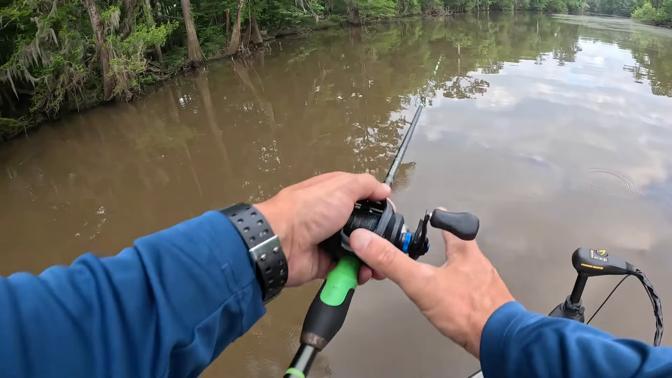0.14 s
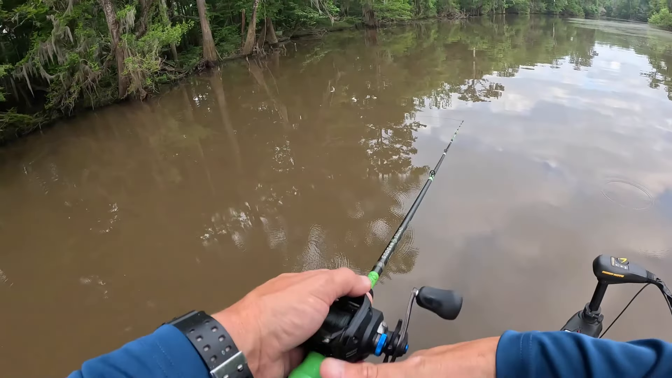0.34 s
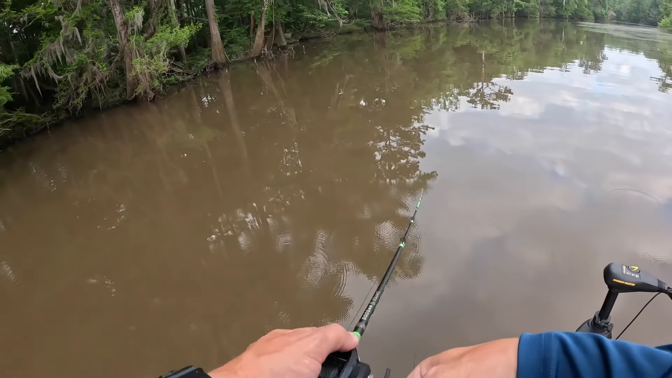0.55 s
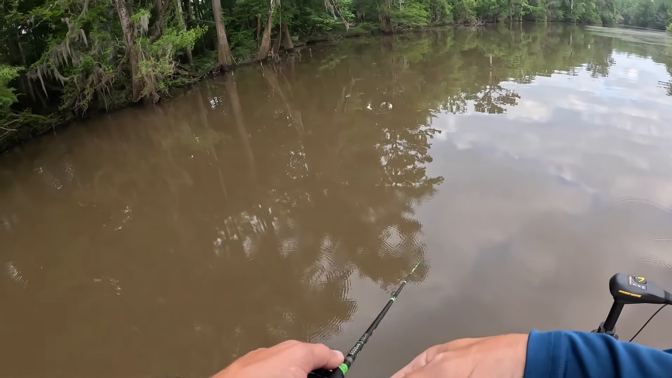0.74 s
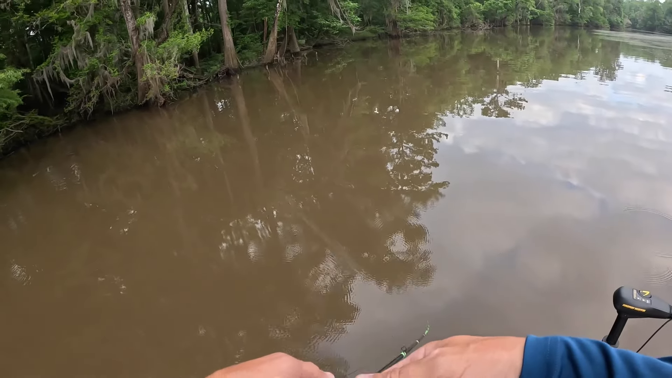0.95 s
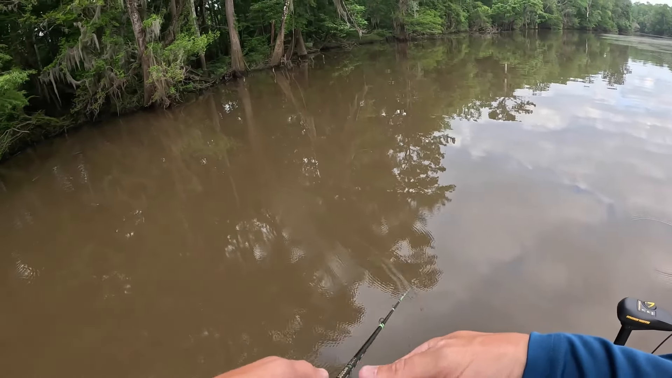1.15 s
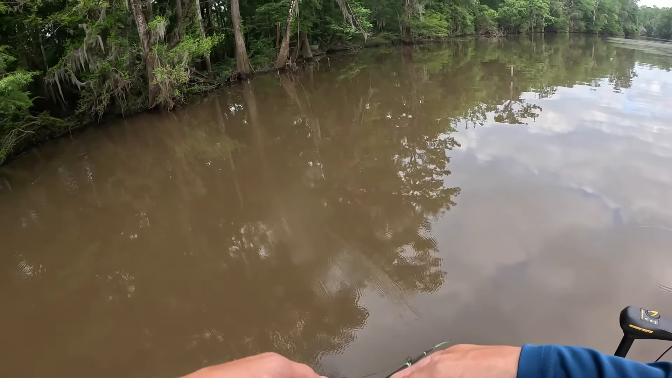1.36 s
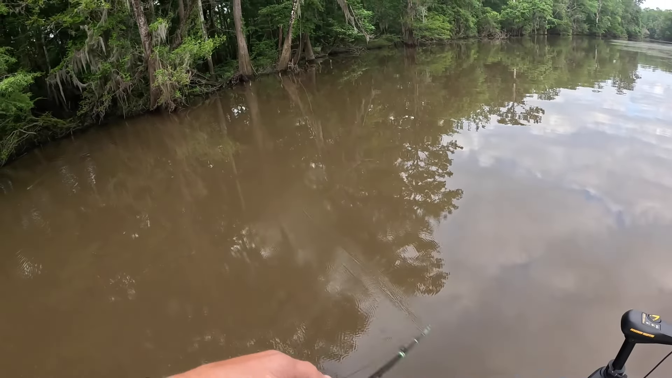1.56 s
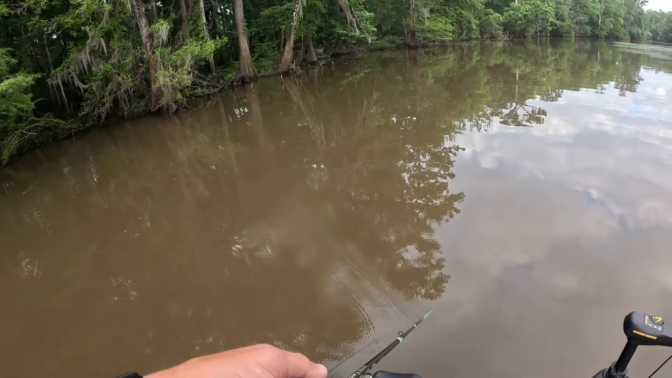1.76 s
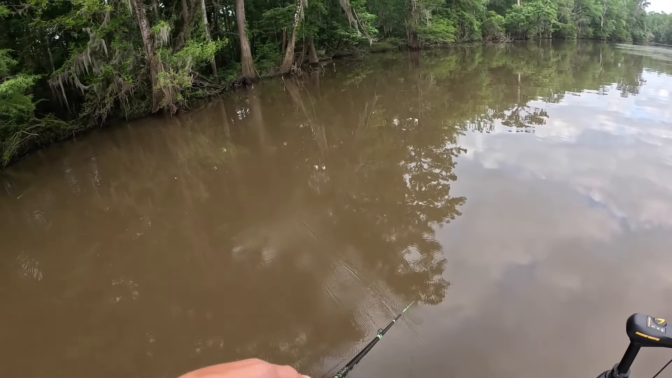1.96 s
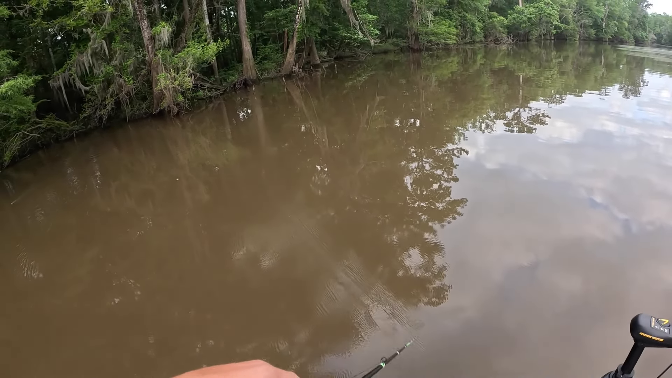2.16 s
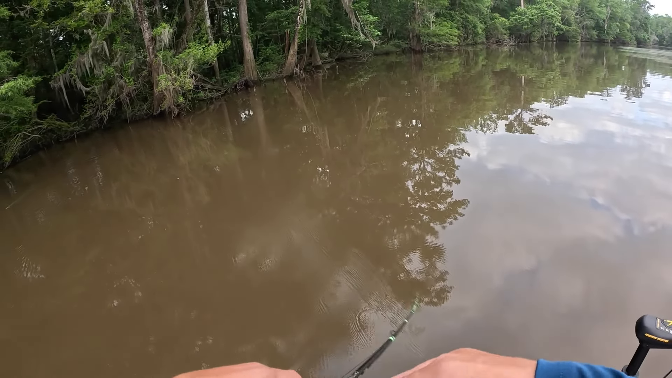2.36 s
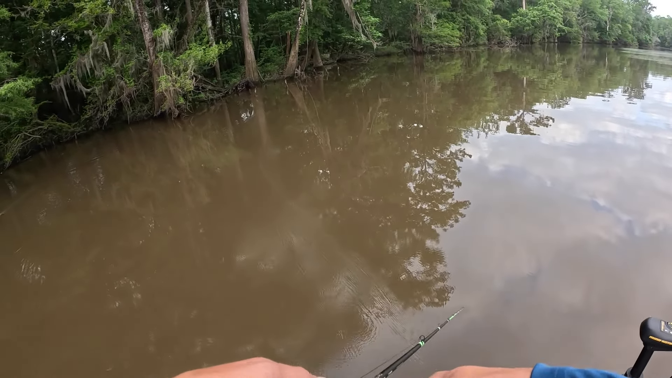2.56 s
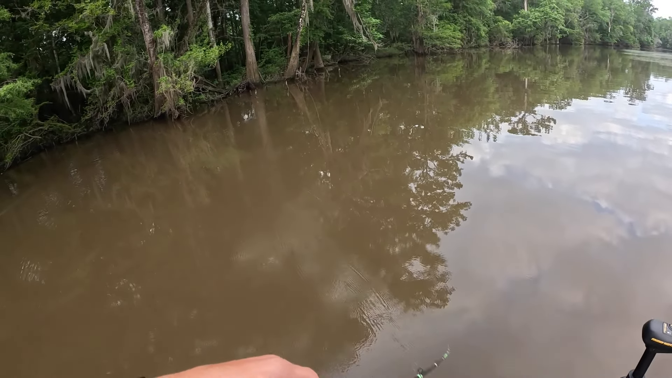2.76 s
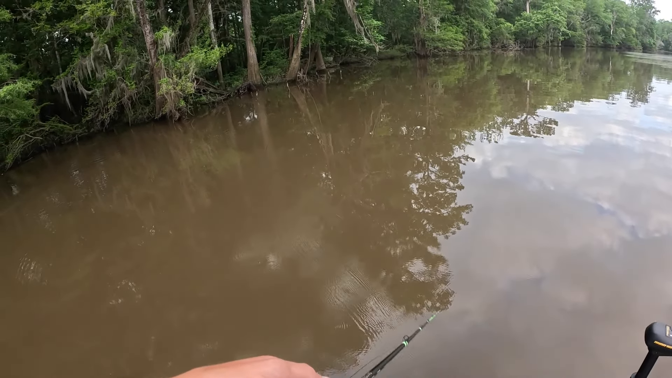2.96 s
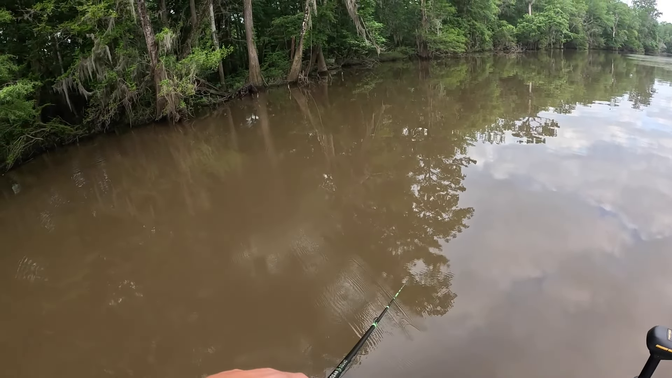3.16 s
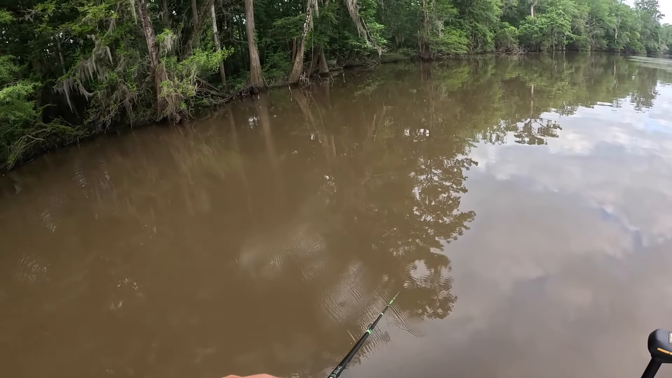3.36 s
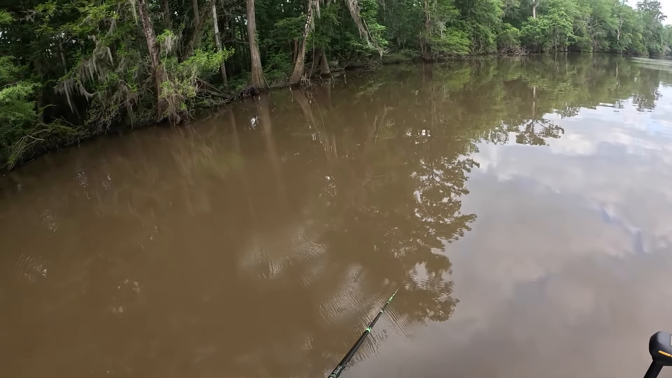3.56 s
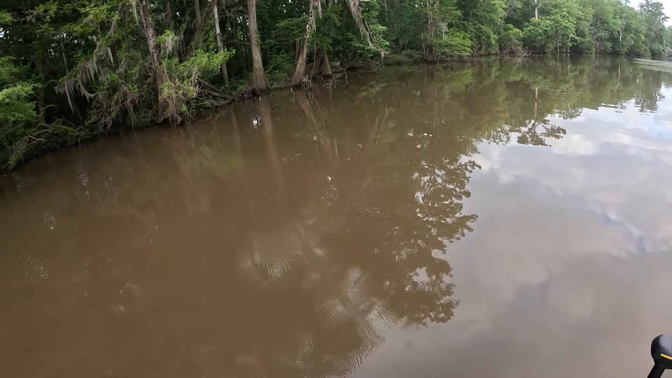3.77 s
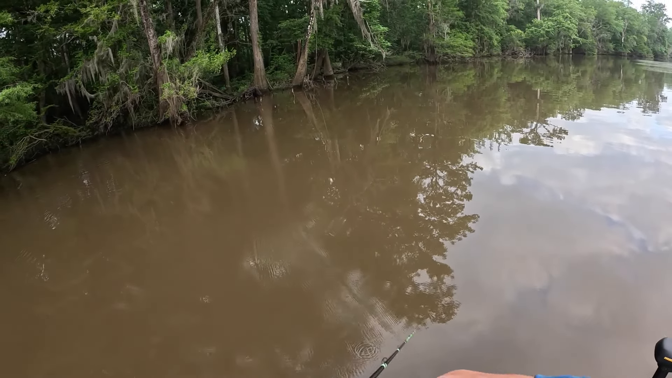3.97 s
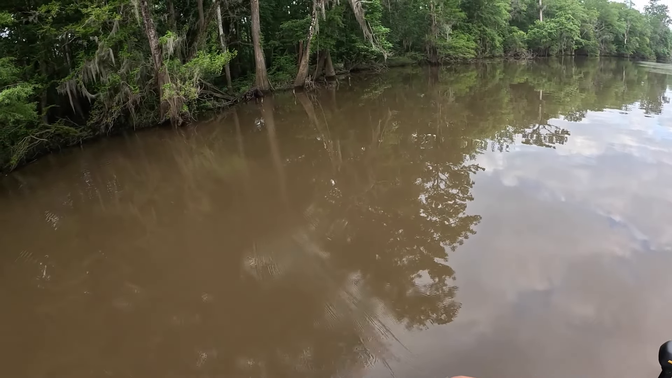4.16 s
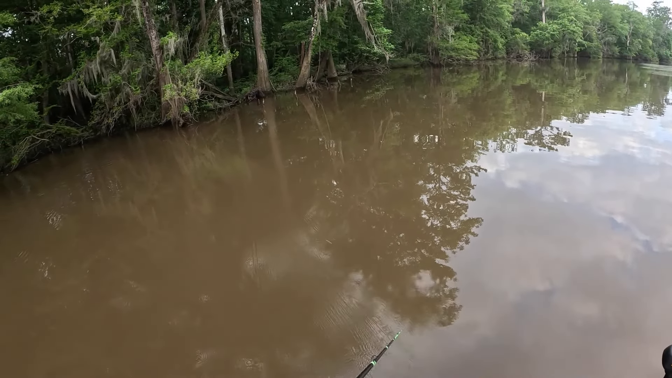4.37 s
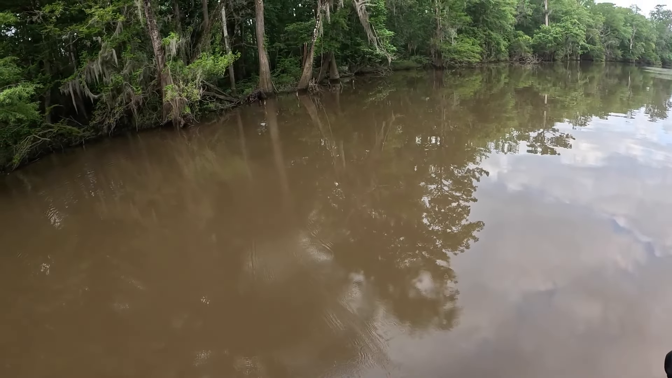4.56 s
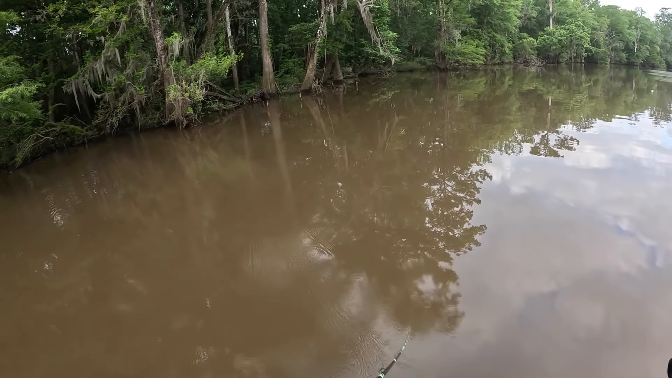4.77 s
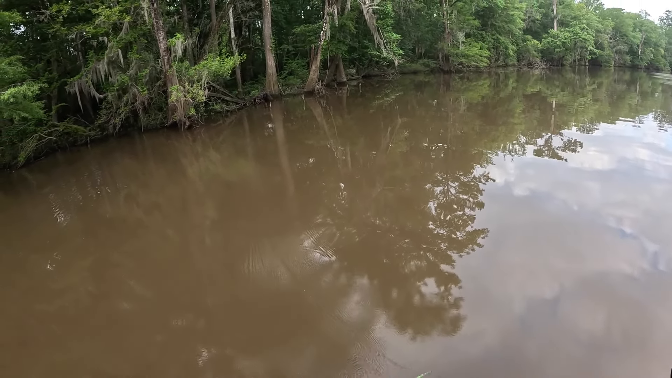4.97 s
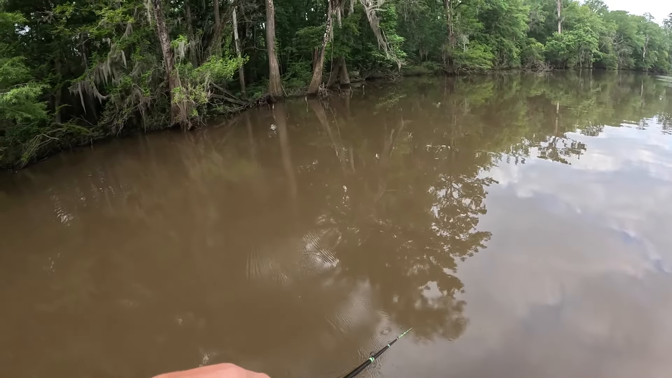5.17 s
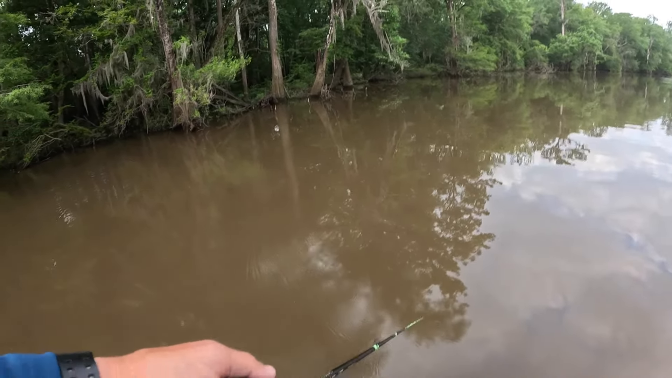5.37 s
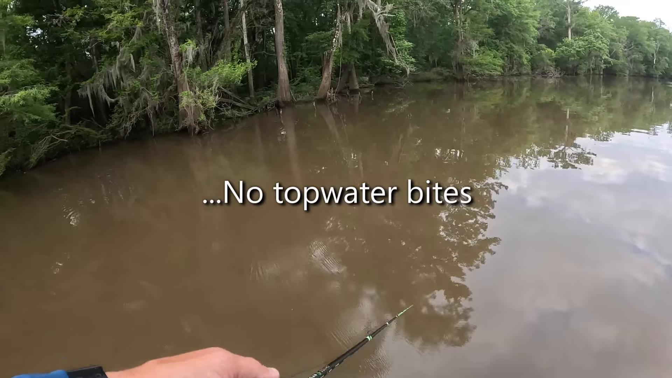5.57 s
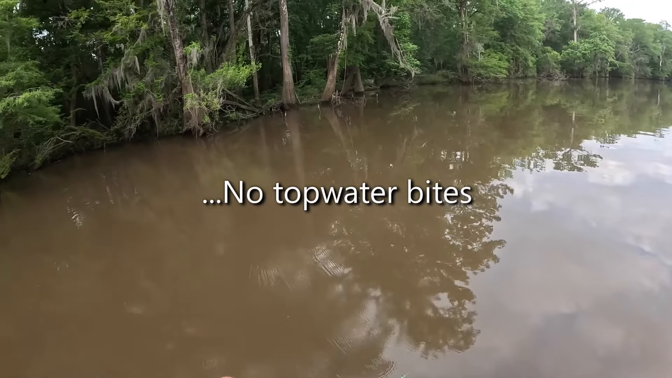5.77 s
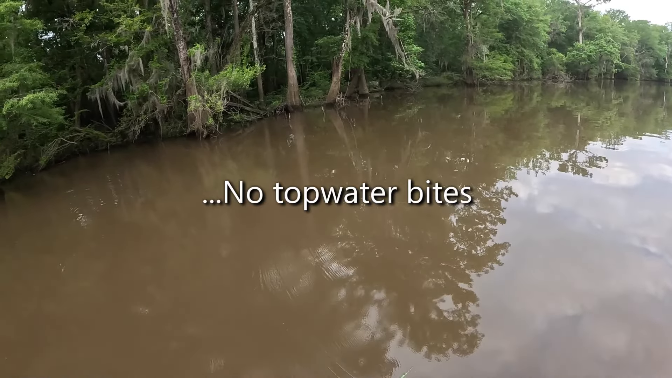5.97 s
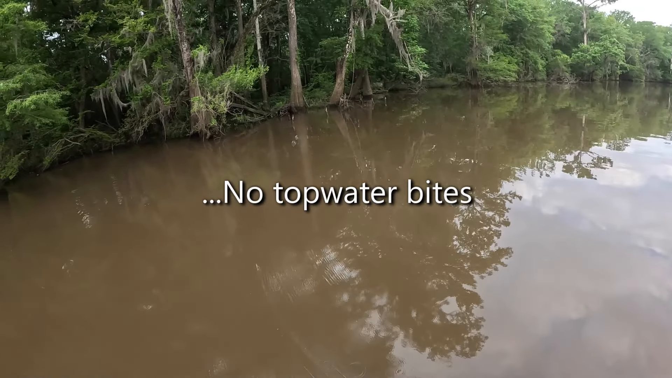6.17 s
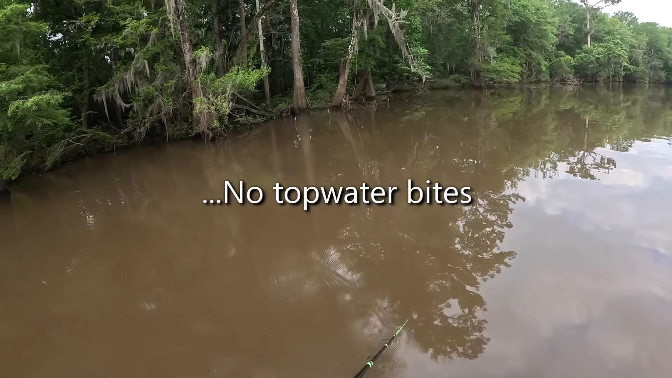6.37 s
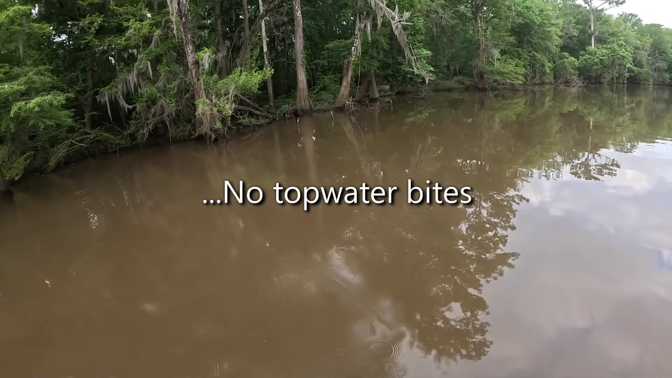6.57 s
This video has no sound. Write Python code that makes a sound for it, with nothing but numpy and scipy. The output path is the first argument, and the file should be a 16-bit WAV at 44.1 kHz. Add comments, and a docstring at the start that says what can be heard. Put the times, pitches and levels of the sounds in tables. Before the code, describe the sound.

Close fishing reel: a low whirring spool, hard metal clack, rhythmic scratchy cranking, sparse bird yelps, hull laps, late cloth rub and bumps.

```python
"""Baitcasting reel on a river boat

Heard close by, a spool whirs out as a low shake and a rough tone, and its clutch clacks in as ringing cracks.
The line is wound back with gear grind, hiss and ticks: quick tugs zip as bands of noise, and line snapping
taut whistles as a gliding tone. Water laps at the hull as thuds and rising bubble tones; birds call
in gliding tones, echoed from the trees. Late on, a sleeve brushes a camera as shaped noise and bumps its case."""
import sys
import numpy as np
from scipy import signal
from scipy.fft import rfft, irfft, next_fast_len
from scipy.io import wavfile
from scipy.ndimage import uniform_filter1d, map_coordinates

SR = 44100
rng = np.random.default_rng(int(sys.argv[2]) if len(sys.argv) > 2 else 0)


def unload_audio(sound):
    """Save the sound as a 16-bit wav file, at the path given as the first command line argument."""
    columns = np.transpose(np.atleast_2d(sound))
    # keep every value between -1 and 1, then stretch to whole-number steps
    steps = np.round(np.clip(columns, -1, 1) * 32767)
    wavfile.write(sys.argv[1], SR, steps.astype(np.int16))


N = 291942  # length in samples

# Levels in the tables are relative within a layer; each function adds its own offsets.
# low rumble, also the colour of the hull's thud: frequency_hz, gain_db
RUMBLE_SPECTRUM = [(20, -0.5), (55, 1), (90, -5.5), (165, -7.5), (230, -13.5), (300, -22), (400, -30.5),
                   (600, -39.5), (1000, -31), (2000, -65.5)]
# decay of the echo from the trees: frequency_hz, t60_s
TREE_DECAY = [(300, 1), (3000, 0.53), (9000, 0.12)]
# a bird's sharp falling calls: start_s, level_db
YELPS = [(0.76, -39), (2.7702, -38.5), (3.085, -42)]
# a thin whistle from the trees: start_s, level_db
FAR_NOTES = [(5.506, -62.5), (5.616, -65)]
NOTE_START_HZ, NOTE_RISE_HZ_PER_S, NOTE_S = 2970, 6500, 0.082
# laps under the hull, with the largest air pocket of each: start_s, level_db, nominal pitch_hz, t60_s, thud_db
LAPS = [(2.619, -37.5, 281.5, 0.28, -63), (3.186, -37, 257, 0.093, -46), (3.285, -35.5, 466, 0.063, -47),
        (3.349, -46.5, 397, 0.21, -52), (3.566, -42.5, 289, .14, -40.5)]
THUD_RISE_S = 0.033  # time to the thud's peak
# small bubbles: greatest delay, ratio of their pitch and decay, and level relative to the large one
BREAKUP_S, SMALLER_RATIO, SMALLER_DB = .045, 1.6, -6.5

# the sleeve's sweep: time_s, rub_db, swish_db
SLEEVE_SWEEP = [(5.22, -61, -70), (5.30, -43, -49.5), (5.34, -41, -44), (5.385, -27.5, -45),
                (5.42, -36, -45), (5.45, -18, -55), (5.50, -47.5, -58.5), (5.57, -60, -75),
                (5.64, -68, -80)]
# low rub and bright swish of cloth: frequency_hz, gain_db
RUB_SPECTRUM = [(20, 1), (60, -5), (110, -5.5), (250, -13.5), (400, -21), (600, -39), (1200, -31),
                (2500, -80)]
SWISH_SPECTRUM = [(290, -32), (500, -3), (586, -6.5), (968, -7.5), (1060, -14), (1180, -9), (2840, -7),
                  (5280, -19), (7130, -11.5), (15500, -36)]
# bumps on the camera: start_s, push_db, push time scale_s, knock_db, tick_db
BUMPS = [(5.4248, -17.5, 0.0012, -16, -18.5), (5.43, -9, 0.0032, -23, -48), (5.446, -38, 0.0018, -20, -31),
         (5.48, -16.5, 0.0086, -37.5, -65)]
# resonances of the camera case: frequency_hz, width_hz, gain_db
CASE_RESONANCES = [(145, 48, -3), (252, 91, -0.5), (314, 50, 0.5), (437, 78, -5), (750, 560, -24.5)]

# course of the winding: time_s, line hiss_db, gear_db
WINDING = [(0.0, -65, -67), (0.18, -64, -67), (0.35, -59.5, -54.5), (0.61, -59.5, -64), (1.58, -62.5, -72),
           (1.82, -59, -59), (2.4, -58.5, -66.5), (2.63, -56, -63.5), (3.02, -57.5, -61.5),
           (3.37, -65, -72), (3.82, -60, -68), (4.44, -61.5, -70), (4.68, -59, -64.5), (5.18, -58, -69),
           (5.53, -64, -71.5), (5.71, -60, -61), (5.86, -58.5, -58), (6.62, -58, -65.5)]
# resonances of the reel's housing: frequency_hz, width_hz, gain_db
HOUSING_RESONANCES = [(1260, 440, -8), (1799, 154, 0), (2022, 8, 3.5), (2136, 11.5, 0), (2445, 26, -11),
                      (2706, 270, -9)]
# hiss of the running line: frequency_hz, gain_db
HISS_SPECTRUM = [(1180, -12.5), (2000, -8), (2350, -2), (2770, -4), (3070, 0), (3770, -1.5), (5450, -2),
                 (5990, -2.5), (7170, 1.5), (8010, 1.5), (8580, -6), (10400, -22), (11900, -13.5),
                 (15500, -37)]
# line biting onto the spool: nominal time_s, level_db, gear_db relative to that level
RASPS = [(0.709, -50, -37), (0.999, -45.5, -27), (1.355, -43, -14.5), (1.643, -38, -16.5),
         (2.1, -45.5, -14), (2.453, -35.5, -14), (3.764, -47, -10), (4.161, -45, -5.5),
         (4.572, -51.5, -0.5), (4.895, -48, -7), (6.206, -47, -0.5)]
# colour of a rasp: frequency_hz, gain_db
RASP_SPECTRUM = [(1470, -12), (2500, -2), (2780, -11), (3100, -4.5), (4640, -6.5), (8160, 1.5),
                 (9010, -5.5), (12200, -14.5), (15500, -27)]
RASP_HALF_S = .018  # from a rasp's peak to 1/e of it
# spells of even cranking, with repeated tugs: first_tug_s, last_tug_s, approximate rate_per_s, level_db
CRANKING = [(0.847, 1.241, 10.3, -42), (1.526, 1.728, 10.2, -40.5), (1.867, 2.275, 9.8, -42),
            (2.515, 3.162, 9.3, -42), (3.271, 4.023, 7.9, -44.5), (4.138, 4.478, 8.8, -42.5),
            (4.578, 5.291, 9.8, -43.5), (5.574, 5.659, 11, -45.5), (5.957, 6.559, 9.9, -45)]
TUG_SCATTER_DB, TUG_JITTER_S = 3.5, .002  # standard deviations from tug to tug
# slack line snapping taut: nominal time_s, level_db
SNATCHES = [(0.699, -48), (0.844, -45.5), (0.944, -50), (1.972, -48), (2.076, -47), (2.117, -48.5),
            (2.339, -47), (2.401, -47), (2.524, -46.5), (2.718, -47), (2.777, -45), (2.837, -51.5),
            (2.983, -51), (3.048, -50), (3.261, -48), (3.394, -47), (3.534, -49.5), (3.646, -43),
            (4.023, -53), (4.716, -47), (4.824, -43), (4.924, -44.5), (5.235, -52), (5.937, -46.5)]
# base pitch, rise above it at the snatch, and nominal lead of the sag on the snatch
SLACK_HZ, TAUT_RISE_HZ, SAG_LEAD_S = 547, 369.7, 0.036

# loudest metal contacts in the reel: nominal start_s, level_db, body_db, frame_db (last two relative to level)
CONTACTS = [(0.138, -25, -4, -25), (0.263, -40, 3, -4), (0.342, -6.5, -24, -30), (0.3521, -7.5, -16, -23),
            (0.357, -1.5, -12.5, -18), (0.407, -28.5, 6, -27), (0.451, -19, 0.5, -36),
            (0.485, -28, -4, -21), (0.496, -30, -4, -2.5), (0.52, -16.5, -1, -25.5), (0.735, -35, -3, -7),
            (1.625, -40, -24, -14), (1.71, -30, -5, -35), (1.907, -30.5, -6, -8.5),
            (1.987, -33.5, 7.5, -16), (2.169, -37, -29, -23), (2.206, -37.5, -0.5, -26),
            (3.135, -30.5, -16, -15), (3.837, -31.5, -30, -32), (3.9, -32, -13, -39),
            (4.868, -35.5, -29, -23), (5.682, -20, -12, -13.5), (5.725, -23, -16, -17.5),
            (5.816, -30.5, -30, -30), (5.835, -25, -28, -30), (5.867, -18, -17, -25),
            (5.899, -40.5, 5.5, -6), (5.988, -30, -18, -18), (6.133, -29.5, -16, -15.5),
            (6.5, -29.5, -10, -17.5)]
# modes of the reel's frame and side plates: frequency_hz, level_db, undamped t60_s
REEL_MODES = [(860, -16.5, 0.063), (1043, -5, 0.12), (1190, -7.5, 0.057), (1380, -44, 0.037),
              (1479, -4, 0.059), (1780, 2.5, 0.03), (1770, -9.5, 0.11), (1860, -14, 0.025),
              (2860, -2, 0.034), (3100, -10.5, 0.028), (4025, -5.5, 0.028), (4120, -23, 0.061),
              (4830, -25, .035), (6150, -3, 0.0063), (6700, -46, 0.017), (7600, -12, 0.017)]
# colour of a metal crack: frequency_hz, gain_db
CRACK_SPECTRUM = [(150, -6), (400, -12), (620, -10), (1100, -3.5), (1750, 2.5), (2400, -3), (3000, -16.5),
                  (3450, -6), (4000, -4.5), (5100, -5.5), (8000, -4), (10500, -22.5), (12200, -25),
                  (15500, -54)]
# the free spool: time_s, shake_db, whirr_db, whirr pitch_hz
FREE_SPOOL = [(0.0, -35.5, -60, 396), (0.09, -36.5, -59, 431), (0.252, -35, -58.5, 417),
              (0.318, -37, -61, 373), (0.33, -32, -66, 396)]

TOP_HZ = 15750  # upper limit of the band


def amp(db):
    """Logarithmic level: decibels to gain."""
    return 10 ** (np.asarray(db) / 20)


def unit(x):
    """Power normalization: scaled to rms 1."""
    return x / np.sqrt(np.mean(x ** 2) + 1e-20)


def crest(x):
    """Peak normalization: scaled to peak 1."""
    return x / (np.abs(x).max() + 1e-20)


def along(points, hz):
    """Interpolation of (Hz, value) points on a log-frequency axis."""
    f, v = np.transpose(points)
    return np.interp(np.log(hz + 1), np.log(f + 1), v)


def curves(rows):
    """Linear interpolation in time: one curve for each column after the time."""
    s, *columns = np.transpose(rows)
    return [np.interp(np.arange(N) / SR, s, column) for column in columns]


def during(rows, fade):
    """Exponential gating: 1 over the span of a table, dying away outside it."""
    t = np.arange(N) / SR
    outside = np.abs(t - np.clip(t, rows[0][0], rows[-1][0]))
    return np.exp(-outside / fade)


def wobble(rate, size=N):
    """Band-limited randomness: a smooth random curve, rate knots a second."""
    knots = rng.standard_normal(int(size * rate / SR) + 4)
    return map_coordinates(knots, [np.arange(size) * rate / SR])


def phase(hz):
    """Phase as the running integral of a moving pitch."""
    return 2 * np.pi * np.cumsum(hz) / SR


def scrape(hz, width, size):
    """Quadrature modulation: a narrow band of noise around a moving pitch."""
    turn = phase(hz)
    return wobble(width, size) * np.cos(turn) + wobble(width, size) * np.sin(turn)


def filtered(x, response):
    """Linear filtering: the spectrum times a response of frequency."""
    n = x.shape[-1]
    m = next_fast_len(n + 8192)
    return irfft(rfft(x, m) * response(np.fft.rfftfreq(m, 1 / SR)), m)[..., :n]


def colour(points):
    """Minimum phase: a causal response with the gain of (Hz, dB) points."""
    def response(hz):
        # folding the cepstrum forward in time gives the minimum phase
        cepstrum = irfft(np.log(amp(along(points, hz)) + 1e-6))
        half = len(cepstrum) // 2
        cepstrum[1:half] *= 2
        cepstrum[half + 1:] = 0
        return np.exp(rfft(cepstrum))
    return response


def resonant(peaks):
    """Modal superposition: (Hz, width, dB) resonances summed with alternating sign."""
    def response(f):
        total = 0
        for k, (centre, width, db) in enumerate(peaks):
            mode = 1j * f * width / (centre * centre - f * f + 1j * f * width)
            total = total + (-1) ** k * amp(db) * mode
        return total
    return response


def pair(side_db, size=N):
    """Partial coherence: white noise in two channels, partly alike."""
    mid, side = rng.standard_normal((2, size))
    return np.array([mid + amp(side_db) * side, mid - amp(side_db) * side])


def noise(response, side_db):
    """Spectral shaping: coloured stereo noise of rms 1."""
    return unit(filtered(pair(side_db), response))


def pan(db):
    """Interchannel level difference: channel gains, positive db to the left."""
    return amp(np.array([[db], [-db]]) / 2)


def add(track, s, sound):
    """Superposition: mix a sound in at time s."""
    i = max(round(s * SR), 0)
    part = track[..., i:i + sound.shape[-1]]
    part += sound[..., :part.shape[-1]]


def air():
    """Low-frequency noise: the rumble of breeze and handling, slowly varying in level."""
    return amp(-49.5 + 2.54 * wobble(9)) * noise(colour(RUMBLE_SPECTRUM), side_db=-13.5)


def birds():
    """Harmonic voicing and diffuse echo: nasal falling yelps and a thin rising whistle off the wooded bank."""
    calls, t = np.zeros(N), np.arange(SR // 14) / SR
    for s, db in YELPS:
        falling_hz = 1530 - 330 * (t / 0.037) ** 2
        turn = phase(falling_hz * (1 + 0.0283 * wobble(400, len(t))))
        harmonics_db = [-8.0, 3, -2.5, -13.5, -3.5]
        yelp = sum(amp(level) * np.sin(k * turn) for k, level in enumerate(harmonics_db, 1))
        swell = np.exp(-((t - .023) / 0.022) ** 2)
        add(calls, s - .008, amp(db - 14.5) * yelp * swell)

    t = np.arange(round(NOTE_S * SR)) / SR
    for s, db in FAR_NOTES:
        note = np.sin(phase(NOTE_START_HZ + NOTE_RISE_HZ_PER_S * t))
        add(calls, s, amp(db) * np.sin(np.pi * t / NOTE_S) * note)

    # the echo is noise that decays at a different rate in each band
    f, age, z = signal.stft(rng.standard_normal((2, SR)), SR, nperseg=256)
    decay = amp(-60 * age / along(TREE_DECAY, f)[:, None])
    tail = signal.istft(z * decay, SR, nperseg=256)[1]
    echo = signal.fftconvolve(calls[None], tail / np.linalg.norm(tail[0]), axes=1)[:, :N]
    return amp(4) * calls + amp(1.5) * echo


def water():
    """Bubble resonance: laps thud on the hull and trap air whose tones rise as it nears the surface."""
    out, t = np.zeros((2, N)), np.arange(SR // 6) / SR
    for s, db, hz, t60, thud_db in LAPS:
        thud = unit(filtered(pair(side_db=-21, size=len(t)), colour(RUMBLE_SPECTRUM)))
        thud_swell = (t / THUD_RISE_S) ** 2 * np.exp(2 - 2 * t / THUD_RISE_S)
        add(out, s, amp(thud_db) * thud * thud_swell)

        # the pocket breaks into two smaller bubbles
        bubbles = [(s, db, hz, t60)]
        for late, high in rng.random(size=(2, 2)):
            small_hz = hz * SMALLER_RATIO ** (.5 + high)
            bubbles.append((s + BREAKUP_S * late, db + SMALLER_DB, small_hz, t60 / SMALLER_RATIO))
        for start, level, pitch, life in bubbles:
            rising_hz = pitch * (.95 + 5 * t)
            bubble = np.sin(phase(rising_hz)) + .3 * scrape(rising_hz, 200, len(t))
            envelope = amp(level - 7.5 - 60 * t / life) * (1 - np.exp(-t / 0.00035))
            add(out, start, envelope * bubble * pan(3.0))
    return out


def sleeve():
    """Friction and impact: cloth sweeps over the camera, then pushes and knocks its case, knocks to the right."""
    rub_db, swish_db = curves(SLEEVE_SWEEP)
    rub = amp(rub_db + 2 + 2.4 * wobble(50)) * noise(colour(RUB_SPECTRUM), side_db=-4.5)
    swish = amp(swish_db + 2.1 * wobble(200)) * noise(colour(SWISH_SPECTRUM), side_db=-1.5)
    out = (rub + swish) * during(SLEEVE_SWEEP, fade=0.022)

    t = np.arange(SR // 6) / SR
    tick_resonance = resonant([(1600, 1900, 0)])
    for s, push_db, length, knock_db, tick_db in BUMPS:
        u = t / length
        push = crest(u * (2 - u) * np.exp(-u) * (1 - np.exp(-u)))
        knock_burst = pair(side_db=-0.5, size=len(t)) * amp(-60 * t / 0.05)
        knock = crest(filtered(knock_burst, resonant(CASE_RESONANCES)))
        tick_burst = pair(side_db=-9, size=len(t)) * amp(-60 * t / 0.01)
        tick = crest(filtered(tick_burst, lambda f: tick_resonance(f) ** 3))
        bump = amp(push_db) * push * pan(1.7) + amp(knock_db) * knock * pan(-11.5) + amp(tick_db) * tick
        add(out, s, bump)
    return out


def grit():
    """Random impulses: tiny ticks of the gears and of settling line, louder where the line hisses louder."""
    hiss_db = curves(WINDING)[0]
    strength = amp(5 * np.minimum(rng.exponential(size=N), 2.4))
    ticks = (rng.random(N) < 30 / SR) * strength  # 30 a second on average
    t = np.arange(SR // 100) / SR
    burst = filtered(pair(side_db=-9, size=len(t)) * amp(-60 * t / 0.003), colour(CRACK_SPECTRUM))
    thin = crest(filtered(burst, colour([(500, -20), (1300, 0)])))
    return signal.fftconvolve((ticks * amp(hiss_db + 9))[None], thin, axes=1)[:, :N]


def winding():
    """Friction noise and resonance: gears grind in the housing and line hisses on, rasping where it bites."""
    hiss_db, gear_db = curves(WINDING)
    t = np.arange(N) / SR
    rasp, grind = np.zeros(N), np.zeros(N)
    for s, db, body_db in RASPS:
        swell = amp(db) * np.exp(-((t - s - .003) / RASP_HALF_S) ** 2)
        rasp += swell
        grind += swell * amp(body_db)

    surge = wobble(22)  # shared by gears and hiss
    gear_level = amp(gear_db + 2.0 + 2.7 * surge + 3.74 * wobble(120)) + amp(3) * grind
    gears = noise(resonant(HOUSING_RESONANCES), side_db=-5.0) * gear_level

    # the line rubs on ever new spots, so its hiss comes in short patches of pitch
    z = signal.stft(noise(colour(HISS_SPECTRUM), side_db=-6), nperseg=256)[2]
    patches = uniform_filter1d(rng.standard_normal(z.shape[1:]), size=4, axis=0)
    patches = unit(uniform_filter1d(patches, size=5, axis=1))
    hiss = unit(signal.istft(z * amp(5.3 * patches), nperseg=256)[1][:, :N])
    hiss = hiss * amp(hiss_db + 1.08 + 0.99 * surge + 1.2 * wobble(400))

    grain = amp(3.5 * wobble(700))
    rasping = amp(-8) * grain * rasp * noise(colour(RASP_SPECTRUM), side_db=-8.0)
    return gears + hiss + rasping


def whistles():
    """Pitch follows tension: the slack line sags, then snaps taut and its whistle shoots upward."""
    out, t = np.zeros((2, N)), np.arange(-SR // 16, SR // 30) / SR
    for s, db in SNATCHES:
        pace = np.exp(.2 * rng.normal())  # no two snatches are alike
        sag = np.exp(np.minimum(-(t / pace + SAG_LEAD_S) / .005, 1))
        tightening = np.exp(np.minimum(t / (0.0075 * pace), 2))
        hz = SLACK_HZ + TAUT_RISE_HZ * (tightening + sag)
        swell = np.exp(-(t / (pace * np.where(t < 0, .021, .016))) ** 2)
        song = np.sin(phase(hz)) + .5 * scrape(hz, 450, len(t))
        level = amp(db - 12.5 + 2.9 * wobble(198, len(t)))
        add(out, s + t[0] + 0.00199, level * swell * song)
    return out


def zips():
    """Periodic friction: at each tug the braid scrapes over the guides, in rough partials that arch in pitch."""
    out, t = np.zeros((2, N)), np.arange(-SR // 20, SR // 20) / SR
    for first, last, rate, db in CRANKING:
        for s in np.linspace(first, last, round((last - first) * rate) + 1):
            arch = 1 + rng.uniform(0, .07) * np.tanh(t / .014) - (t / .11) ** 2
            hz = 2030 * (1 + 0.049 * rng.normal()) * arch
            song = np.zeros(len(t))
            # partials 2 to 6; the fundamental is absent
            for k, level in zip(np.arange(2, 7), [-7.5, 2.5, 6.5, -40, -11]):
                song += amp(level + rng.normal(0, 2)) * scrape(k * hz, 260 * k, len(t))
            swell = amp(db - 17.5 + TUG_SCATTER_DB * rng.normal()) * np.exp(-(t / 0.0084) ** 2)
            add(out, s + t[0] + 0.0023 + TUG_JITTER_S * rng.normal(), swell * song)
    return out


def clicks():
    """Impact excites modes: each crack rings the reel's body; the gripping hand damps all but the hardest."""
    out, t = np.zeros((2, N)), np.arange(SR // 6) / SR
    for s, db, body_db, frame_db in CONTACTS:
        decay = amp(-60 * t / 0.0081) + amp(-12.5 - 60 * t / 0.038)
        burst = pair(side_db=-11, size=len(t)) * decay * (1 - np.exp(-t / 0.00044))
        # light parts that hardly move the body give a thin, bright tick
        thin_db = np.interp(body_db, [-26, -12, 0], [-7, 0, 5])
        tilt = colour([(3500, thin_db), (5500, 0)])
        crack = filtered(burst, lambda f: colour(CRACK_SPECTRUM)(f) * tilt(f))
        crack /= np.sqrt(np.mean(np.sum(crack ** 2, axis=1)))  # unit energy per channel on average

        freedom = np.interp(db, [-20, -9], [.45, 1])  # share of the undamped decay time
        ring = np.zeros((2, len(t)))
        for hz, level, t60 in REEL_MODES:
            # the frame governs low modes, the body the middle ones
            strength_db = np.interp(hz, [1200, 1447, 2250, 3280], [frame_db + 6, body_db, body_db, -9])
            start_phase = rng.uniform(0, 2 * np.pi) + rng.normal(0, 0.62, (2, 1))
            swing = np.sin(2 * np.pi * hz * t + start_phase)
            ring += amp(level + strength_db + rng.normal(0, 1.3) - 60 * t / (t60 * freedom)) * swing
        ring *= 1 - np.exp(-t / 0.0001)
        add(out, s + .0008, amp(db + 9) * crack + amp(db - 5.5) * ring)
    return out * pan(-0.1)


def spool():
    """Rotating imbalance: the free spool shakes the rod and whirs roughly until the clutch stops it."""
    shake_db, whirr_db, whirr_hz = curves(FREE_SPOOL)
    turn = phase(29.5 * (1 + 0.0074 * wobble(7.7)))  # about 29.5 turns per second
    shake = amp(shake_db + 8) * (np.cos(turn) + amp(-21.5) * np.cos(3 * turn))
    whirr = np.sin(phase(whirr_hz)) + .8 * scrape(1.08 * whirr_hz, 220, N)
    whirr = amp(whirr_db + 1.0) * unit(whirr)
    return (shake * during(FREE_SPOOL, fade=0.062) + whirr * during(FREE_SPOOL, fade=.01)) * pan(-.6)


def scene():
    """Superposition: river and bank behind, sleeve at the camera, reel and line close by."""
    surroundings = air() + birds() + water()
    reel = grit() + winding() + whistles() + zips() + clicks() + spool()
    return surroundings + sleeve() + reel


def record(dry):
    """Band limitation: nothing at or above TOP_HZ passes."""
    return filtered(dry, lambda hz: hz < TOP_HZ)


dry = scene()
out = record(dry)
unload_audio(out)
```